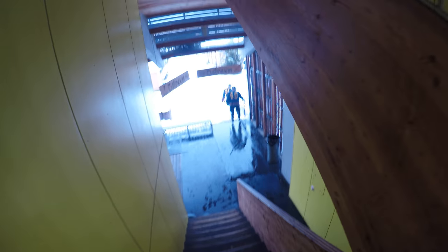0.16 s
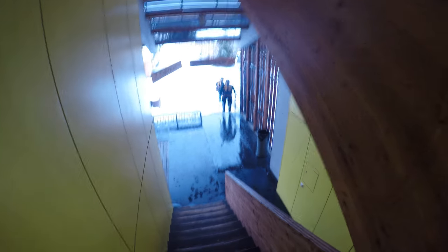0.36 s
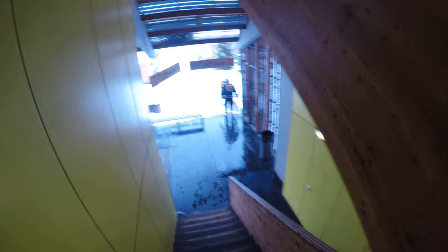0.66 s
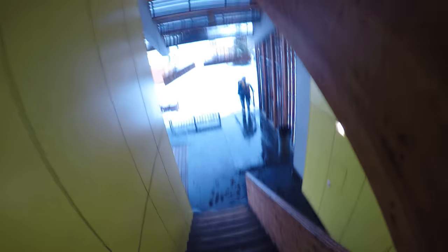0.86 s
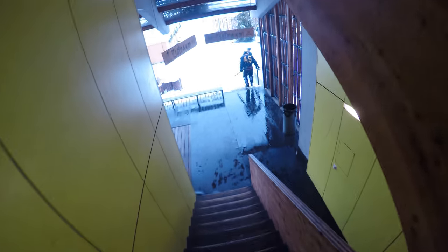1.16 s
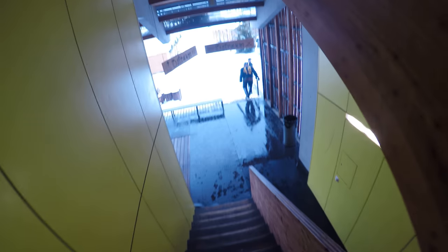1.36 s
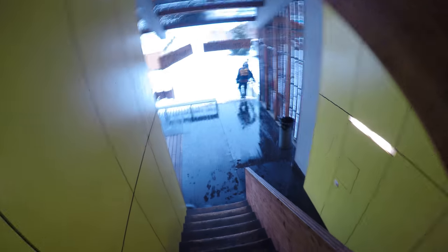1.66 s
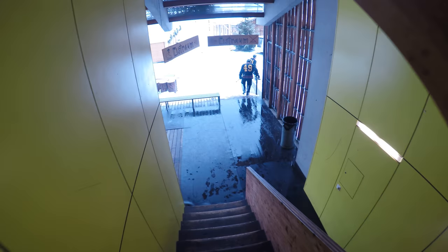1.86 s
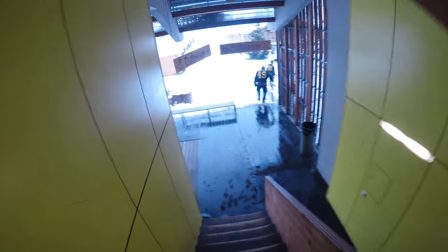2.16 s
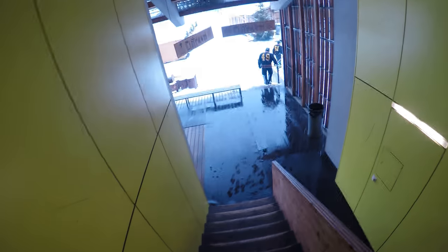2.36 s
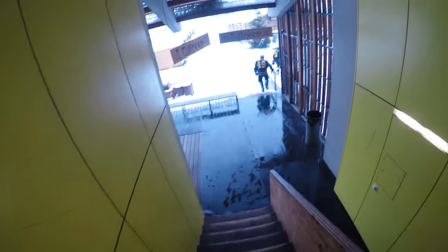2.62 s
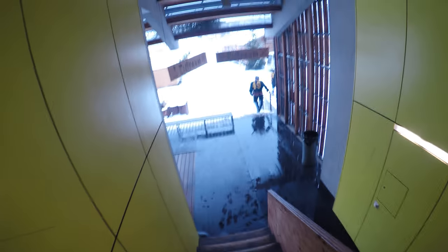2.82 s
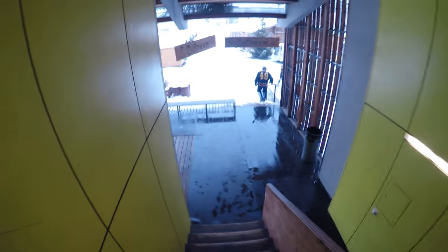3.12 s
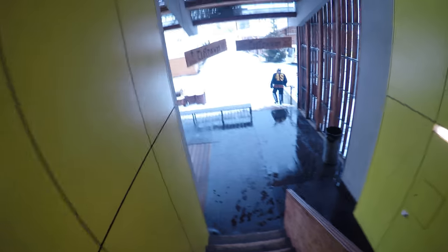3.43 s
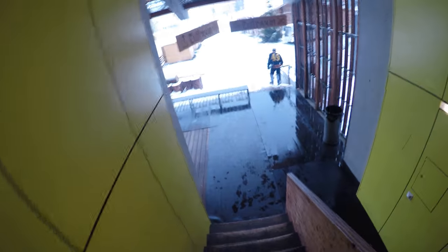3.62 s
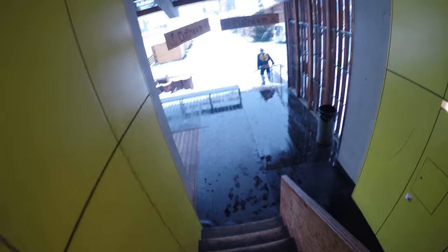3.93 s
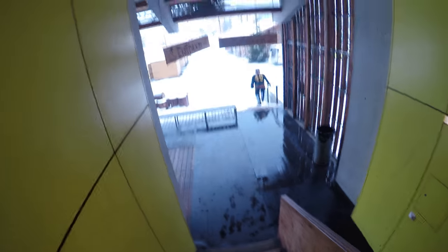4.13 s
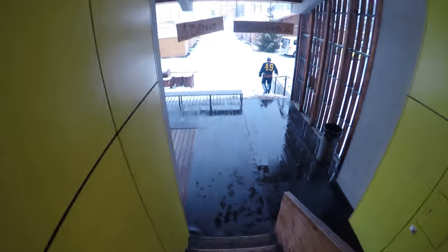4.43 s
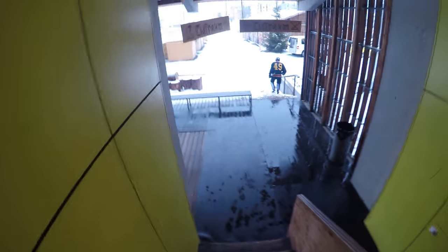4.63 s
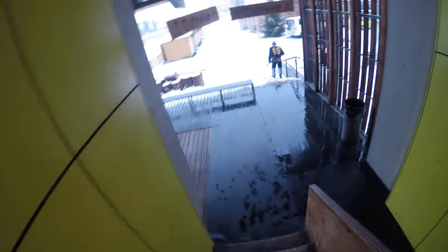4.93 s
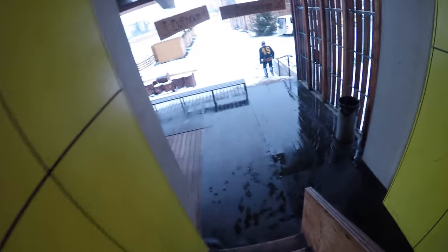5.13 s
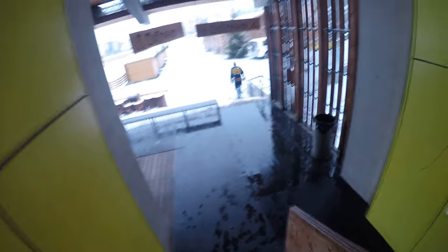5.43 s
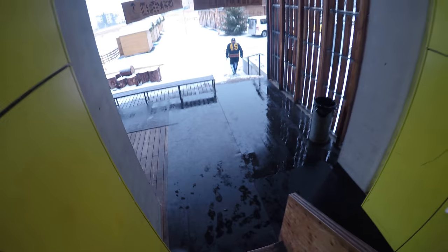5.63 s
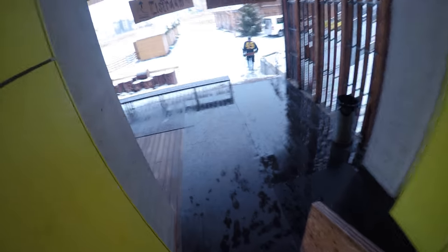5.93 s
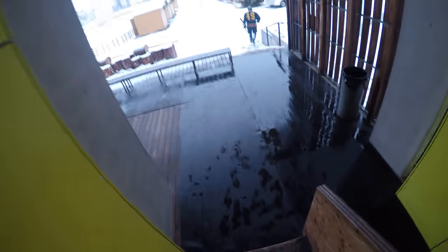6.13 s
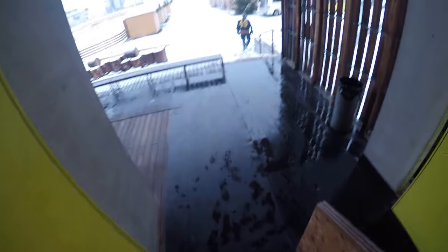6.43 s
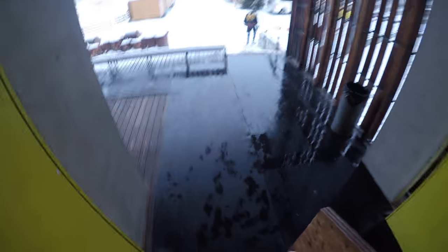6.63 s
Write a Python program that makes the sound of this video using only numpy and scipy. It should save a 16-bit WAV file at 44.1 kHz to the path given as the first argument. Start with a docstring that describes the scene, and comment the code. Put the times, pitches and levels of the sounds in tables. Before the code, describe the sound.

A person walks down a wooden staircase inside a quiet, hard-walled stairwell, captured by a stereo microphone worn on the body. Faint air and clothing rustle open the scene, with a strong heel knock at about 0.2 seconds. Further steps land near 0.8, 1.5, 2.1, 2.8, 3.4, 4.1, 4.7, 5.4, 5.9 and 6.4 seconds, alternating slightly lower and higher in pitch. Each is a hollow wooden knock with a tiny click and heavy thud, followed within a few hundredths of a second by a sole slap and fine grit crunch. Short reflections fade in under half a second. Very low rumbling wobble swells with each landing. Dull bumps fall between steps, cloth swishes as legs swing, and faint strap groans appear around 2.4, 3.0, 5.1 and 5.6. Small toe scrapes come near 1.0, 2.3, 3.6, 5.5 and 6.6. The pace stays even to the end.

```python
"""Footsteps on a wooden stair, heard from a worn camera

Someone walks down a wooden staircase into a hard-floored lobby, a two-port camera microphone on the body.
Heels click, knock and thud on ringing treads; soles slap down and grind grit; the stairwell answers.
Cloth hisses, a strap groans and the mount rocks at a low rate, over quiet air shaped from noise.
Struck sounds are short pulses and dying vibrations; rubbing sounds are coloured noise under moving gains."""
import sys
import numpy as np
from scipy import signal
from scipy.fft import rfft, irfft
from scipy.io import wavfile
from scipy.ndimage import uniform_filter1d

SR = 44100
rng = np.random.default_rng(int(sys.argv[2]) if len(sys.argv) > 2 else 0)


def store_wav(level_fs):
    """Save 16-bit WAV to argv[1]."""
    pcm = np.round(np.clip(np.atleast_2d(level_fs), -1, 1) * 32767)
    wavfile.write(sys.argv[1], SR, pcm.T.astype(np.int16))


N = 298677
TIME = np.arange(N) / SR  # seconds through the whole walk
EVENT_TIME = np.arange(32768) / SR  # seconds through one short sound

# Quiet lobby air. Each row: frequency in Hz, relative density in dB per Hz.
AIR_COLOUR = [(41, -34), (70, -2.5), (91, -6), (152, -3), (227, -11), (316, -7.5), (958, -26.5),
              (1170, -17), (2600, -30.5), (6300, -30), (10000, -39.5), (12500, -51.5), (14000, -82)]
# Stairwell decay. Each row: frequency in Hz, time to fall 60 dB in seconds.
ROOM_DECAY = [(80, 0.38), (250, 0.47), (700, 0.42), (2000, 0.33), (5000, 0.67), (12000, 0.27)]

# Diffuse sound at the two microphone ports. Each row: frequency in Hz, likeness from 0 to 1.
PORT_LIKENESS = [(120, 1), (230, .96), (350, .65), (500, .85), (750, .45), (1100, .5), (1800, .55),
                 (2300, .35), (3800, .55), (5200, .15), (6800, .32), (11000, .1)]
# Phase between the ports. Each row: frequency in Hz, lead of the left in radians.
PORT_LEAD = [(0, 0), (520, -0.0), (1120, 2.5), (2930, -0.1), (4480, 0.3), (6460, -3.4), (9560, -3.3),
             (11900, -2.3), (13600, 1.9), (13900, -0.5)]
# Level between the ports. Each row: frequency in Hz, left minus right in dB.
PORT_TILT = [(60, -2.4), (110, -3.8), (200, -1.5), (370, 1), (670, 0.5), (1220, -2.5), (2240, -1),
             (4090, -1), (7480, -3), (13700, -3)]

# Heel strikes. Each row: start in seconds, knock level in dB, knock pitch in Hz, hardness as a factor
# on the knock spectrum's frequencies, click level in dB, thud level in dB, room tail on the knock in dB,
# tread ring within the knock in dB, grit level in dB, heel scuff level in dB, cloth swish level in dB.
HEEL_STRIKES = [(0.182, -8, 510, .86, -26.5, -11.5, -4.5, -29, -29.5, -30.5, -29.5),
                (0.767, -12, 584, 1.05, -27.5, -12, 3, -15, -42, -33, -33.5),
                (1.53, -9.5, 475, 1.005, -33, -16, -0.5, -22, -34, -55, -31),
                (2.12, -12, 664, 1.03, -28.5, -15, 4.5, -22, -34, -30.5, -31),
                (2.762, -9, 497, 0.99, -30, -17, -0.5, -22, -29.5, -49, -30),
                (3.405, -12.5, 700, 1.05, -32, -9.5, 2.5, -21.5, -27.5, -29, -31.5),
                (4.077, -13, 525, 1.05, -29.5, -13.5, 2.5, -24, -26, -34, -32),
                (4.717, -12.5, 606, 0.95, -26, -13, 4, -19.5, -41, -31.5, -31.5),
                (5.359, -10.5, 510, 1.1, -31, -18, -3.5, -17, -30.5, -49, -32),
                (5.895, -11, 625, 0.96, -37, -14.5, 0, -26, -39.5, -35.5, -32.5),
                (6.441, -11.5, 477, 1.02, -34, -14.5, 1, -18.5, -34.5, -49, -32)]
# Soles slapping down. Each row: start in seconds, slap level in dB, wood level in dB, tick level in dB.
SOLE_SLAPS = [(0.2254, -18.5, -19.5, -64), (0.2828, -26, -36, -43), (0.8011, -20, -34, -37),
              (0.8265, -25.5, -35, -39.5), (1.5738, -26.5, -19.5, -59), (2.2473, -30, -27.5, -36),
              (2.8135, -21.5, -22, -60), (2.8828, -29.5, -36, -56), (3.455, -19, -22, -34),
              (4.1195, -17.5, -25, -55), (4.7606, -20, -49, -35.5), (4.7975, -25, -29, -46),
              (5.3954, -25.5, -18.5, -52), (5.4056, -25, -34, -48), (5.7748, -36.5, -58, -43),
              (5.9379, -23, -19, -59), (5.9618, -31, -37, -40), (6.4882, -21.5, -54, -40),
              (6.5214, -26, -21.5, -42.5)]
# Toes twisting and scraping as some steps end. Each row: peak in seconds, level in dB.
TOE_SCRAPES = [(.985, -37.5), (2.262, -32), (3.551, -33), (5.53, -35), (6.62, -39)]
# Soft low bumps. Each row: start in seconds, level in dB, pitch in Hz.
BODY_BUMPS = [(0.732, -17, 140), (1.137, -31, 148), (1.285, -30.5, 138), (1.726, -26.5, 74),
              (2.011, -24.5, 143), (2.143, -17.5, 140), (2.245, -20.5, 134.4), (2.955, -17.5, 123.6),
              (2.974, -23.5, 80), (3.302, -28, 136.4), (3.425, -23.5, 74), (4.139, -18.5, 78),
              (4.616, -23, 152), (5.065, -19.5, 146), (5.215, -28.5, 149), (5.423, -18.5, 126),
              (5.558, -22.5, 148), (6.668, -22.5, 75), (6.741, -31, 135)]
# Camera strap rubbing. Each row: peak in seconds, level in dB, pitch in Hz, spread in seconds.
STRAP_RUBS = [(.03, -37.5, 320, 0.028), (2.405, -32, 305, 0.017), (2.501, -38.5, 360, 0.098),
              (2.96, -33.5, 280, .02), (3.145, -37.5, 406, 0.039), (5.09, -29, 287, 0.017),
              (5.135, -34.5, 278, 0.028), (5.151, -54, 450, .04), (5.195, -38, 266, 0.054),
              (5.58, -31, 265, 0.011)]
# Free leg swinging through. Each row: peak in seconds, cloth swish level in dB,
# camera sway level in dB ahead of its unevenness.
LEG_SWINGS = [(.06, -34, -20.5), (.6, -35.5, -24), (1.19, -45, -30), (1.94, -38.5, -31), (2.56, -37, -23),
              (3.22, -38.5, -27), (3.88, -40.5, -26.5), (4.52, -43.5, -31.5), (5.15, -39.5, -23.5),
              (5.79, -46.5, -43), (6.31, -43.5, -31.5)]

# Tread vibrations. Each row: lowest frequency in Hz, level in dB, time to fall 60 dB in seconds.
TREAD_MODES = [(145, -4, 0.63), (268.4, -14, 0.34), (336.7, -3.5, 0.17), (543, -5.5, 0.067),
               (623, -2.5, 0.09), (689, 4.5, 0.11), (766.5, -4, 0.38), (894, -21, 0.11), (1583, -5, 0.11)]
# Heel block vibrations. Each row: lowest frequency in Hz, level in dB, time to fall 60 dB in seconds.
HEEL_BLOCK_MODES = [(1310, -24, 0.02), (1790, -6, 0.031), (2020, -11, 0.016), (3300, -14, 0.041)]

# Wood knocked, at hardness 1. Each row: frequency in Hz, relative density in dB per Hz.
KNOCK_COLOUR = [(60, -17), (200, -11.5), (320, -3.5), (480, -5), (780, 1.5), (970, -6), (1200, -19),
                (2000, -27), (4000, -61), (14000, -112)]
# Heel edge clicking. Each row: frequency in Hz, relative density in dB per Hz.
CLICK_COLOUR = [(200, -28), (900, -7), (1300, 6), (1900, 5.5), (2500, -4), (3500, -11.5), (4800, -16.5),
                (7500, -25), (10000, -47), (13000, -44)]
# Body weight thudding. Each row: frequency in Hz, relative density in dB per Hz.
THUD_COLOUR = [(20, -1.5), (50, 7.5), (90, 4), (150, -4.5), (240, -8), (450, -22.5), (1500, -39.5),
               (14000, -84)]
# Sole slapping. Each row: frequency in Hz, relative density in dB per Hz.
SLAP_COLOUR = [(150, -23), (700, -0.5), (1200, 5), (1850, 0.5), (2500, -12), (3500, -16), (5000, -25.5),
               (8000, -26.5), (14000, -85)]
# Bright tick within a slap. Each row: frequency in Hz, relative density in dB per Hz.
TICK_COLOUR = [(500, -7), (2500, 2), (4000, 4), (7000, 3), (10000, -15), (13000, -33)]
# Grit crushed underfoot. Each row: frequency in Hz, relative density in dB per Hz.
GRIT_COLOUR = [(100, -21), (290, 8), (450, -2.5), (760, 5.5), (1050, 6.5), (1550, 5), (2000, -3),
               (2550, -15.5), (3500, -19.5), (6000, -27), (13000, -50)]
# Camera rumbling on its mount. Each row: frequency in Hz, relative density in dB per Hz.
SHAKE_COLOUR = [(10, 2.5), (40, 2.5), (75, -10.5), (150, -9.5), (300, -17.5), (1000, -80)]
# Cloth rubbing. Each row: frequency in Hz, relative density in dB per Hz.
CLOTH_COLOUR = [(100, -26), (500, 11), (1000, 11.5), (1800, 6.5), (2800, 0), (4500, -3.5), (6500, 1),
                (8000, -5.5), (9500, -12.5), (11000, -21), (12800, -26), (14300, -40)]

AIR_DB = -40.5
EDGE_HZ = 14200  # upper band limit
BUMP_T60_S = .17
# The weight rolls over the ball of the foot this long after the heel strike.
BALL_S, BALL_SPREAD_S = 0.079, 0.026
SCRAPE_SPREAD_S = 0.014
# The heel's scuff starts at once and dies away.
SCUFF_FALL_DB_PER_S = 104
# Cloth swishes as the knee bends, this long after the heel strike; it never quite stops rustling.
KNEE_S, KNEE_RISE_DB_PER_S, KNEE_FALL_DB_PER_S, RUSTLE_DB = 0.096, 206, 95, -50
SWING_RISE_DB_PER_S, SWING_FALL_DB_PER_S = 121, 58
# Each landing jolts the camera with the same envelope, peaking this long after the heel strike.
JOLT_DB, JOLT_S, JOLT_SPREAD_S = -6, 0.092, 0.044
# The mount rebounds once; its constant tremble is set ahead of the sway's unevenness.
REBOUND_DB, REBOUND_S, REBOUND_SPREAD_S, TREMBLE_DB = -17.5, 0.21, 0.028, -34.5
ROCK_HZ = 21.4  # steady in the jolts, the centre of a wandering rate in the sway


def gain_of(db):
    """Decibels to amplitude."""
    return 10 ** (np.asarray(db) / 20)


def evened(x):
    """Scales to rms 1."""
    return x / np.sqrt(np.mean(x ** 2) + 1e-20)


def read(points, hz):
    """Reads a table on a log-frequency axis."""
    f, value = np.transpose(points)
    return np.interp(np.log(hz + 1), np.log(f + 1), value)


def add(mix, s, sound):
    """Mixes a sound in at time s, cut off at the end of the mix."""
    part = mix[:, max(round(s * SR), 0):][:, :sound.shape[1]]
    part += sound[:, :part.shape[1]]


def coloured(x, colour):
    """Gives a sound a spectrum, at rms 1."""
    size = x.shape[-1]
    gain = gain_of(read(colour, np.fft.rfftfreq(size, 1 / SR)))
    return evened(irfft(rfft(x) * gain, size))


def pressure(t, spread_s):
    """A stroke that swells and fades as a bell curve, greatest at t = 0."""
    return np.exp(-(t / spread_s) ** 2 / 2)


def swell(peak_s, rise_db_per_s, fall_db_per_s):
    """A gain that climbs to 1 at peak_s and falls away again, both steadily in dB."""
    rise_db = (TIME - peak_s) * rise_db_per_s
    fall_db = (peak_s - TIME) * fall_db_per_s
    return gain_of(np.minimum(rise_db, fall_db))


def together(gains):
    """The joint level of unrelated movements: their powers add."""
    return np.sqrt(sum(gain ** 2 for gain in gains))


def blow(colour):
    """A struck pulse: minimum phase packs the spectrum's energy as early as causality allows."""
    hz = abs(np.fft.fftfreq(len(EVENT_TIME), 1 / SR))
    log_gain = np.log(gain_of(read(colour, hz)))
    pulse = np.fft.ifft(np.exp(np.conj(signal.hilbert(log_gain)))).real
    return pulse / np.linalg.norm(pulse) * np.sqrt(.005 * SR)  # energy of 5 ms at rms 1


def mode(hz, t60):
    """One vibration dying away exponentially."""
    return np.sin(2 * np.pi * hz * EVENT_TIME) * np.exp(-np.log(1000) * EVENT_TIME / max(t60, 1e-3))


def ring(modes):
    """A struck body's vibrations; each blow raises their pitches by up to 3% and picks their signs."""
    out = 0
    for hz, db, t60 in modes:
        sign = rng.choice([-1, 1])
        out = out + gain_of(db) * sign * mode(hz * rng.uniform(1.0, 1.03), t60)
    return out


def contact(pulse, again_db):
    """The rubber lands and catches the tread again a few milliseconds later."""
    late = round(rng.uniform(.004, .008) * SR)
    return pulse + gain_of(again_db) * np.pad(pulse, (late, 0))[:len(pulse)]


def diffuse(pair):
    """Two unrelated signals become one sound field, partly alike at the two ports."""
    size = pair.shape[1]
    a, b = rfft(pair)
    same = np.clip(read(PORT_LIKENESS, np.fft.rfftfreq(size, 1 / SR)), 0, 1)
    shared = a * np.sqrt((1 + same) / 2)
    apart = b * np.sqrt((1 - same) / 2)
    return irfft(np.array([shared + apart, shared - apart]), size)


def stairwell(x, near_db, tail_db, near_s, right_db):
    """Direct sound, a flurry off close walls and steps, and a tail, with reflections drawn anew each time."""
    # sparse random reflections: one sample in ten carries one
    taps = rng.choice([-1., 0, 1.], (2, 2, len(EVENT_TIME)), p=[.05, .9, .05])
    near, far = (diffuse(pair) for pair in taps)
    near *= np.exp(-EVENT_TIME / near_s) * (EVENT_TIME > .002)
    # the tail dies at its own rate in each frequency band
    hz, t, z = signal.stft(far, SR, nperseg=256)
    decay = np.exp(-np.log(1000) * t / read(ROOM_DECAY, hz)[:, None])
    far = signal.istft(z * decay, SR, nperseg=256)[1][:, :len(EVENT_TIME)]
    far *= 1 - np.exp(-EVENT_TIME / 0.012)
    paths = gain_of(near_db) * evened(near) + gain_of(tail_db) * evened(far)
    paths /= np.sqrt(len(EVENT_TIME))
    paths[:, 0] += gain_of([-right_db, right_db])  # direct sound: left lowered, right raised
    return signal.fftconvolve(x[None], paths, axes=1)[:, :len(EVENT_TIME)]


def patchy_noise(colour, patch_db, bass_patch_db):
    """Noise whose level drifts in small patches of time and pitch, with a separate depth for the bass."""
    hz, _, z = signal.stft(diffuse(rng.standard_normal((2, N))), SR, nperseg=512)
    patches = uniform_filter1d(rng.standard_normal(z.shape[1:]), size=12, axis=0)
    patches = evened(uniform_filter1d(patches, size=8, axis=1))
    depth_db = read([(200, bass_patch_db), (600, patch_db)], hz)[:, None]
    noise = signal.istft(z * gain_of(depth_db * patches), nperseg=512)[1][:, :N]
    return coloured(noise, colour)


def air():
    """The lobby's quiet air: faint, slightly patchy noise all around the microphone."""
    return gain_of(AIR_DB) * patchy_noise(AIR_COLOUR, patch_db=0.9, bass_patch_db=0.5)


def sway(wander=0.32, jolt_shake_db=-16.5, shake_db=-17, swing_spread_s=0.17, uneven_db=4.5):
    """The camera rocks on its mount at each landing and wobbles unevenly with each swing; both rumble."""
    landing = gain_of(JOLT_DB) * pressure(EVENT_TIME - JOLT_S, JOLT_SPREAD_S)
    landing = landing + gain_of(REBOUND_DB) * pressure(EVENT_TIME - REBOUND_S, REBOUND_SPREAD_S)
    rock = -np.sin(2 * np.pi * ROCK_HZ * EVENT_TIME)  # dips first
    jolts = np.zeros((1, N))
    for s, *_ in HEEL_STRIKES:
        rumble = coloured(rng.standard_normal((1, len(EVENT_TIME))), SHAKE_COLOUR)
        add(jolts, s, landing * (gain_of(jolt_shake_db) * rumble + rock))
    swings = [gain_of(sway_db) * pressure(TIME - s, swing_spread_s) for s, _, sway_db in LEG_SWINGS]
    # slow noises bend the wobble's rate and its level
    slow_colour = [(1, -1.5), (9, 0.0), (25, -29), (100, -73)]
    drift, lumps = coloured(rng.standard_normal((2, N)), slow_colour)
    level = together([gain_of(TREMBLE_DB), *swings]) * gain_of(uneven_db * np.tanh(lumps))
    rate_hz = ROCK_HZ * np.exp(wander * drift)
    wobble = evened(np.sin(2 * np.pi * np.cumsum(rate_hz) / SR))
    shake = gain_of(shake_db) * coloured(rng.standard_normal(N), SHAKE_COLOUR)
    return jolts + level * (wobble + shake)


def clothes():
    """A hiss of rubbing: heels scuff, cloth swishes as the knee bends and as the other leg swings through."""
    moves = [gain_of(RUSTLE_DB)]
    for s, *_, scuff_db, swish_db in HEEL_STRIKES:
        scuff = gain_of(scuff_db - SCUFF_FALL_DB_PER_S * abs(TIME - s))
        moves.append((TIME > s) * scuff)
        moves.append(gain_of(swish_db) * swell(s + KNEE_S, KNEE_RISE_DB_PER_S, KNEE_FALL_DB_PER_S))
    for s, swish_db, _ in LEG_SWINGS:
        moves.append(gain_of(swish_db) * swell(s, SWING_RISE_DB_PER_S, SWING_FALL_DB_PER_S))
    return together(moves) * patchy_noise(CLOTH_COLOUR, patch_db=2.0, bass_patch_db=-4.0)


def rubs(fall_db=-13):
    """The strap drags and gives a short, dull groan: noise peaked at one pitch under a swelling stroke."""
    out = np.zeros((2, N))
    for s, db, hz, spread_s in STRAP_RUBS:
        start = max(s - .2, 0)  # room for the swell
        colour = [(20, -40), (hz / 1.66, fall_db), (hz, 0), (hz * 1.36, fall_db), (hz * 3, -36), (14000, -80)]
        noise = coloured(rng.standard_normal(len(EVENT_TIME)), colour)
        groan = gain_of(db) * pressure(start + EVENT_TIME - s, spread_s) * noise
        add(out, start, stairwell(groan, near_db=-11, tail_db=-8.5, near_s=0.0092, right_db=1.5))
    return out


def bumps():
    """Dull, low knocks as the body shifts: one low vibration with a thud and a little wood."""
    out = np.zeros((2, N))
    for s, db, hz in BODY_BUMPS:
        bump = mode(hz, BUMP_T60_S) * (1 - np.exp(-EVENT_TIME / 0.0025))
        bump = bump + gain_of(-7.5) * blow(THUD_COLOUR) + gain_of(-23) * blow(KNOCK_COLOUR)
        add(out, s, stairwell(gain_of(db) * bump, near_db=-10.0, tail_db=-6, near_s=0.025, right_db=0.0))
    return out


def crunch(db, peak_s, spread_s, grain_db=6.0, grains_per_s=400):
    """Randomly timed grains of unequal size crush under a pressure that swells and fades."""
    count = len(EVENT_TIME)
    size = gain_of(grain_db * np.minimum(rng.exponential(1, count), 3)) * rng.choice([-1, 1], count)
    grains = coloured(size * (rng.random(count) < grains_per_s / SR), GRIT_COLOUR)
    crushed = gain_of(db) * pressure(EVENT_TIME - peak_s, spread_s) * grains
    return stairwell(crushed, near_db=0.5, tail_db=-6.0, near_s=0.0084, right_db=-2.0)


def grit():
    """Grit grinds under the ball of the foot at every step, and under the toes when they twist."""
    out = np.zeros((2, N))
    lead_s = .1  # room for the scrape to swell
    for s, *_, grit_db, _scuff_db, _swish_db in HEEL_STRIKES:
        add(out, s, crunch(grit_db, BALL_S, BALL_SPREAD_S))
    for s, db in TOE_SCRAPES:
        add(out, s - lead_s, crunch(db, lead_s, SCRAPE_SPREAD_S))
    return out


def soles():
    """The front of the shoe slaps down: a bright pulse and tick, with knocked and ringing wood."""
    out = np.zeros((2, N))
    for s, slap_db, wood_db, tick_db in SOLE_SLAPS:
        slap = gain_of(slap_db) * blow(SLAP_COLOUR) + gain_of(tick_db) * blow(TICK_COLOUR)
        wood = gain_of(wood_db) * (blow(KNOCK_COLOUR) + gain_of(-10.5) * ring(TREAD_MODES))
        landing = contact(slap + wood, again_db=-17)
        add(out, s, stairwell(landing, near_db=1.5, tail_db=2.5, near_s=0.0061, right_db=0.0))
    return out


def heels():
    """The heel's edge clicks, the wood knocks and rings, and the body's weight thuds in just after."""
    out = np.zeros((2, N))
    for s, knock_db, hz, hardness, click_db, thud_db, room_db, ring_db, *_ in HEEL_STRIKES:
        push = blow([(f * hardness, db) for f, db in KNOCK_COLOUR])  # a harder heel reaches higher
        board = gain_of(-4.5) * mode(hz, t60=0.028) * (1 - np.exp(-EVENT_TIME / 0.0013))
        knock = contact(gain_of(-5) * push, again_db=-12) + board + gain_of(ring_db) * ring(TREAD_MODES)
        click = contact(blow(CLICK_COLOUR) + gain_of(-8) * ring(HEEL_BLOCK_MODES), again_db=-10.5)
        click = gain_of(click_db) * click
        knock = gain_of(knock_db) * knock
        thud = gain_of(thud_db) * blow(THUD_COLOUR)
        add(out, s, stairwell(click, near_db=1.0, tail_db=5.5, near_s=0.0022, right_db=3.5))
        add(out, s + 0.00044, stairwell(knock, near_db=0.5, tail_db=room_db, near_s=0.026, right_db=1.5))
        add(out, s + 0.00602, stairwell(thud, near_db=-2, tail_db=3, near_s=0.021, right_db=-1.0))
    return out


def scene():
    """Air, camera, clothes and strap, then the steps on the stair."""
    return air() + sway() + clothes() + rubs() + bumps() + grit() + soles() + heels()


def record(dry, ceiling=0.9):
    """The microphone ports differ in phase and level; the highest peaks are rounded, then the top is cut."""
    hz = np.fft.rfftfreq(N, 1 / SR)
    # half of each difference goes to the left, its inverse to the right
    half = gain_of(read(PORT_TILT, hz) / 2) * np.exp(1j * read(PORT_LEAD, hz) / 2)
    ports = irfft(rfft(dry) * np.array([half, 1 / half]), N)
    rounded = ports / (1 + (ports / ceiling) ** 8) ** (1 / 8)
    low_pass = signal.firwin(255, EDGE_HZ, window=("kaiser", 9), fs=SR)
    return signal.oaconvolve(rounded, low_pass[None], "same")


dry = scene()
out = record(dry)
store_wav(out)
```